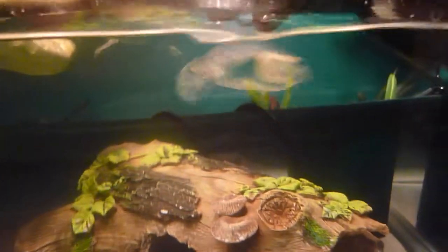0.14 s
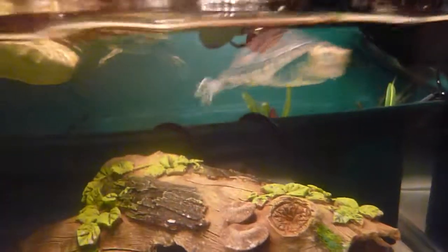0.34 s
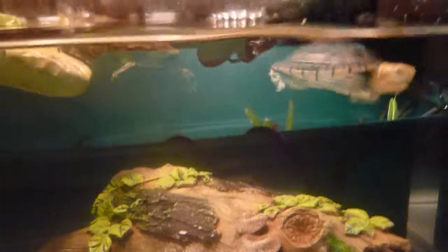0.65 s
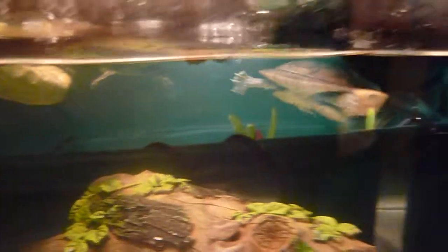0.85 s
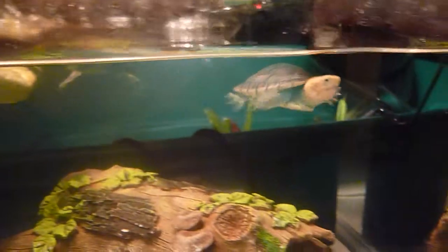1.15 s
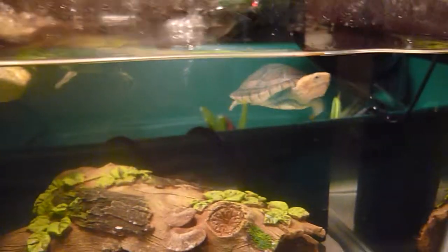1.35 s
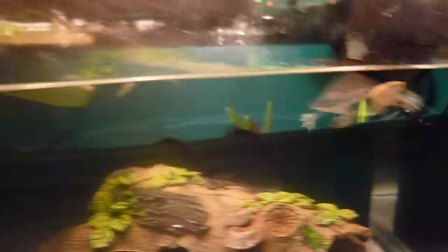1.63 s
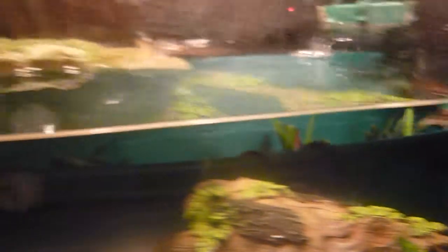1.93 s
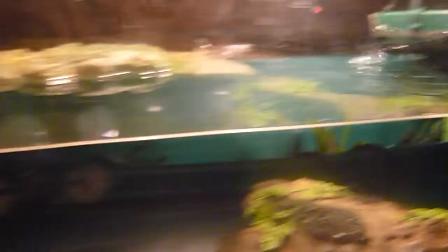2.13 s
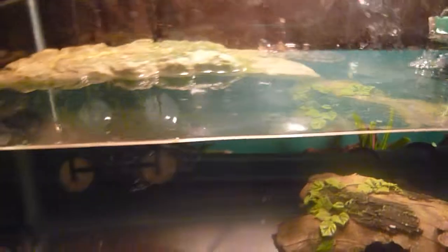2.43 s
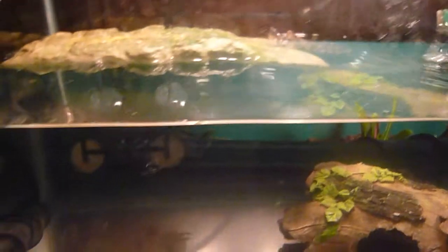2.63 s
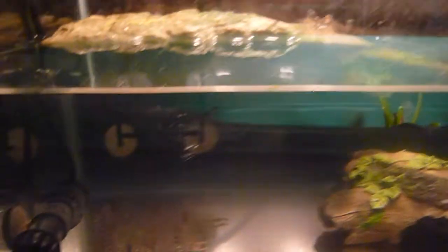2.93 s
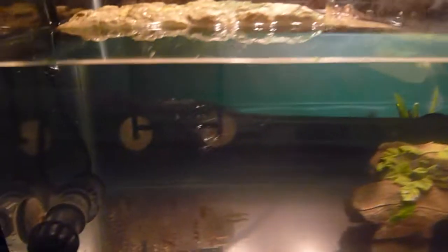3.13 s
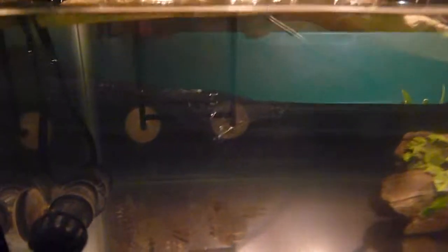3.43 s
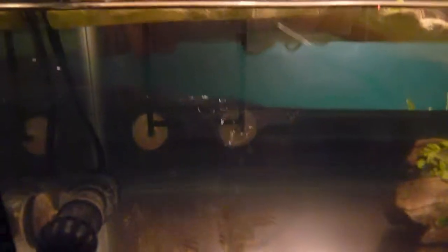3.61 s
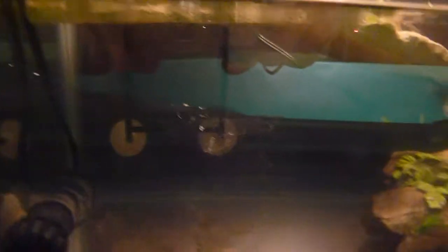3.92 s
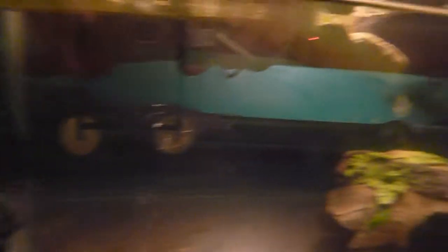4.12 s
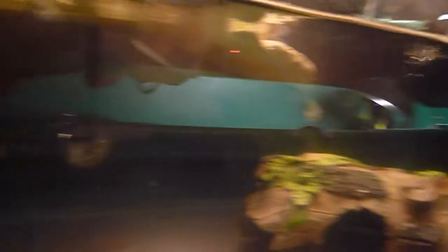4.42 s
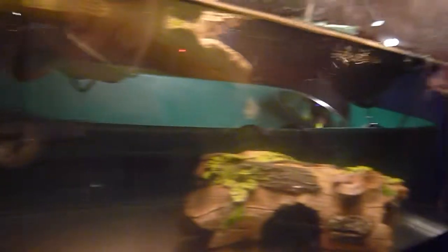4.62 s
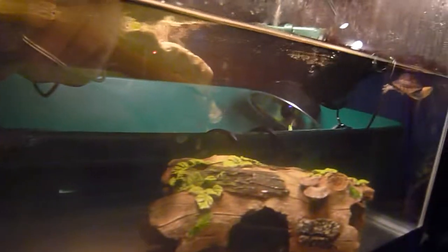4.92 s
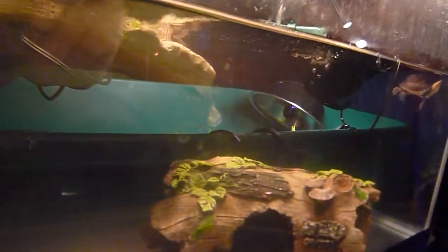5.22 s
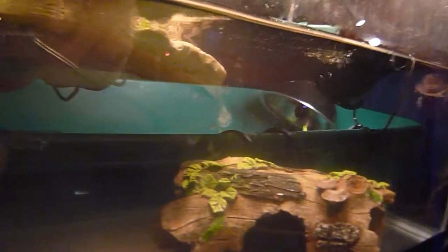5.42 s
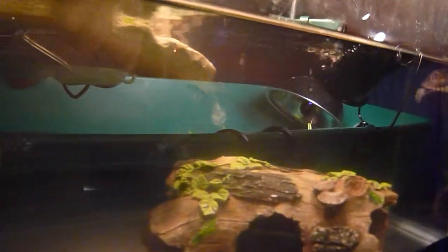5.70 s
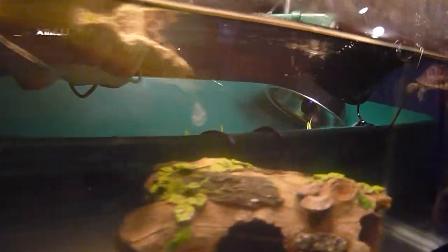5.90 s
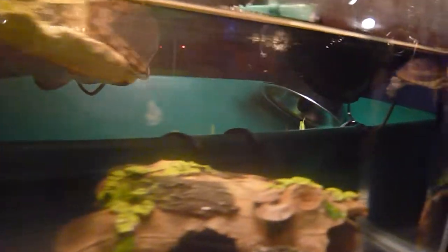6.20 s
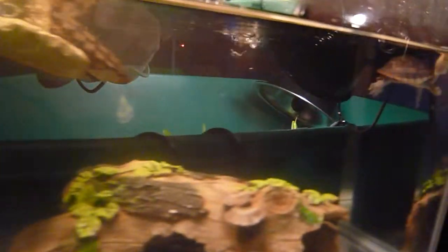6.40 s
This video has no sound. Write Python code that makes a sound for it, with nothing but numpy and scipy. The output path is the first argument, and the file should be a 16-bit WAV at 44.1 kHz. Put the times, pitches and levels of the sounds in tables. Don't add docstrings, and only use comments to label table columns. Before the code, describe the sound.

An aquarium filter hums steadily at a low pitch, its stand and glass rumbling softly underneath. Over it lies a thin water hiss with small bubbles and irregular drips, busiest at the start and again just before three seconds. Tiny bright splashes tap the surface, ringing briefly in glass and hood. A small hand-held microphone adds a few dry handling ticks around the middle.

```python
import sys
import numpy as np
from scipy import signal
from scipy.fft import rfft, irfft, next_fast_len
from scipy.io import wavfile

SR = 44100
rng = np.random.default_rng(int(sys.argv[2]) if len(sys.argv) > 2 else 0)


def wav_out(sig):
    wavfile.write(sys.argv[1], SR, np.round(np.clip(np.atleast_2d(sig).T, -1, 1) * 32767).astype(np.int16))


def to_linear_factor(level_db):
    exponent = np.asarray(level_db, float) / 20
    return 10 ** exponent


N = 288855


def in_time(rows):
    s, *columns = np.transpose(rows)
    return [np.interp(np.arange(N) / SR, s, column) for column in columns]


def drift(rate_hz):
    settle = 2000
    pole = np.exp(-2 * np.pi * rate_hz * 40 / SR)
    noise = rng.standard_normal(N // 40 + 2 + settle)
    slow = signal.lfilter([1], [1, -2 * pole, pole * pole], noise)[settle:]
    return np.interp(np.arange(N) / 40, np.arange(len(slow)), slow / slow.std())


def coloured(points, peaks, patchy_db, rate_hz):
    size = next_fast_len(N, real=True)
    hz = np.maximum(np.fft.rfftfreq(size, 1 / SR), 1)
    point_hz, level_db = np.transpose(points)
    gain = to_linear_factor(np.interp(np.log(hz), np.log(point_hz), level_db, left=-60))
    for centre_hz, width_hz, peak_db in peaks:
        gain = gain * (1 + (to_linear_factor(peak_db) - 1) / (1 + (2 * (hz - centre_hz) / width_hz) ** 2))
    spectrum = rfft(rng.standard_normal(size)) * gain
    shared = drift(rate_hz)
    out = 0
    for octave in range(4, 15):
        band = np.clip(1 - abs(np.log2(hz) - octave), 0, 1)
        flicker = to_linear_factor(patchy_db * (1.34 * shared + drift(rate_hz)))
        out = out + irfft(spectrum * band, size)[:N] * flicker
    return out / out.std()


def pump(hum_db, buzz_db):
    mains_hz = 60.02
    # multiple of mains, level/dB re strongest
    harmonics = [(2, 0), (3, -20), (4, -19), (5, -23), (6, -26), (8, -27), (10, -32)]
    # f/Hz, level/dB re hum
    whirr = [(57.2, -18.5), (220.5, -31), (259, -19.5)]
    buzzing = (3, 4)
    t = np.arange(N) / SR
    lines = [(k * mains_hz, line_db, k in buzzing) for k, line_db in harmonics]
    lines += [(hz, line_db, False) for hz, line_db in whirr]
    out = 0
    for hz, line_db, buzzes in lines:
        waver = to_linear_factor(0.34 * drift(1.0) * (-1.5 - line_db / 8))
        level = to_linear_factor(line_db + buzzes * buzz_db) * waver
        out = out + level * np.sin(2 * np.pi * (hz * t + rng.random()))
    return np.sqrt(2) * to_linear_factor(hum_db) * out


def rumble(level_db):
    # f/Hz, level/dB per Hz
    spectrum = [(25, -17), (34, -12.5), (50, -2.5), (70, -1), (130, 2.5), (170, -1.5), (250, 1.5), (480, 0),
                (560, -6.5), (750, -10.5), (1000, -13), (1500, -17.5), (3000, -37.5)]
    # f/Hz, width/Hz, level/dB
    panels = [(36.2, 9.3, 12.5), (84.8, 14.5, 13), (156, 12, 2.5), (264, 15, 3), (315, 16, 2.5),
              (348, 19, 2), (461, 16.4, 6), (552, 6.2, 7.5), (657, 49, 5), (1100, 12, 6)]
    return to_linear_factor(level_db + 2.0) * coloured(spectrum, panels, patchy_db=0.34, rate_hz=16.0)


def hiss():
    # f/Hz, level/dB per Hz
    spectrum = [(600, -33), (1200, 0.5), (2000, -6.5), (3000, -0.5), (5000, -3.5), (7000, -6.5),
                (10000, -8), (15000, -10)]
    peaks = [(2800, 30, 4), (1280, 60, 3)]  # f/Hz, width/Hz, level/dB
    return to_linear_factor(-57.5) * coloured(spectrum, peaks, patchy_db=0.4, rate_hz=8.0)


def add(track, s, sound):
    at = int(s * SR)
    track[at:at + len(sound)] += sound[:N - at]


def scaled(sound, energy_db):
    return sound * to_linear_factor(energy_db) / np.sqrt(np.sum(sound ** 2) / SR)


def hood():
    # f/Hz, strength, t60/s
    modes = [(1100, 0.41, 0.19), (1290, 0.17, 0.24), (1428, 0.28, 0.21), (2836, 0.29, 0.11),
             (3050, 0.13, 0.11), (3605, 0.22, 0.24)]
    t = np.arange(8000) / SR
    return sum(gain * np.sin(2 * np.pi * hz * t) * to_linear_factor(-60 * t / t60_s) for hz, gain, t60_s in modes)


def echoed(sound, decay_s, chance):
    wall_s, wall_gain, direct_gain = 0.0065, 14.0, 17.0
    room_db, room_t60_s = -6, 0.23
    t = np.arange(len(chance)) / SR
    wall = round(wall_s * SR)
    fading = to_linear_factor(-60 * t / decay_s) + to_linear_factor(room_db - 60 * t / room_t60_s)
    echoes = chance * fading * np.clip(t / wall_s, 0, 1) ** 2
    echoes[0] = direct_gain * np.sqrt(0.2 / max(decay_s, 0.05))
    echoes[wall] += wall_gain * fading[wall]
    fade_out = np.clip((t[-1] - t) / 0.03, 0, 1)
    return signal.fftconvolve(sound, echoes)[:len(t)] * fade_out


def bubble(energy_db, hz, spread_hz, decay_s, chance):
    t = np.arange(3000) / SR
    ring_s = 0.33 / max(spread_hz, 0.07 * hz)
    cycles = (hz - 0.35 * spread_hz) * t + 0.1 * spread_hz * t ** 2 / ring_s
    envelope = np.exp(-t / ring_s) * (1 - np.exp(-t / (0.5 * ring_s)))
    ring = np.sin(2 * np.pi * cycles) * envelope
    return scaled(echoed(ring, decay_s, chance), energy_db)


def trickle():
    count, rate_per_s, floor_db = 400, 40.0, -90
    out = np.zeros(N)
    rows = rng.random((count, 4))
    times = np.cumsum(-np.log(1 - rows[:, 0]) / rate_per_s)
    chances = rng.standard_normal((count, 4000)) + hood()[:4000]
    for s, (_, size, pitch, wide), chance in zip(times, rows, chances):
        if s < N / SR:
            hz = 1000 * 9.0 ** pitch
            spread_hz = hz * (0.052 + 0.069 * wide)
            add(out, s, bubble(floor_db + 9 * size, hz, spread_hz, 0.07, chance))
    return out


def bubbles():
    # t/s, energy/dB, f/Hz, echo t60/s
    drips = [(.073, -60, 1290, 0.1), (.088, -68, 1470, 0.13), (.075, -62.5, 2970, .15),
             (.354, -80, 3420, .08), (.522, -63, 1115, 0.17), (1.117, -62.5, 3700, 0.24),
             (1.18, -75, 2780, .11), (2.331, -67, 1245, 0.32), (2.398, -64.5, 2720, 0.18),
             (2.41, -72, 1300, .12), (2.6, -69.5, 1270, .18), (2.642, -68, 1500, 0.15),
             (2.665, -70, 1100, .1), (2.7, -69, 3350, 0.15), (2.773, -68, 1100, .08),
             (2.795, -70, 1290, .092), (2.927, -70.5, 3440, .11), (2.927, -63, 1100, 0.033),
             (3.432, -66.5, 2760, 0.11), (4.137, -74.5, 3300, .15), (4.524, -66, 2840, 0.052),
             (4.524, -70, 1095, 0.085), (5.252, -73, 2320, 0.098), (4.989, -77, 1100, 0.072),
             (5.625, -78, 2740, .07), (5.885, -72, 2880, 0.093), (6.064, -79, 3520, .07),
             (6.177, -67, 2730, .12)]
    # t/s, energy/dB, f/Hz, echo t60/s
    beads = [(.092, -74, 4470, .27), (.38, -75, 4430, .1), (0.379, -73, 5230, .13), (.516, -78, 5920, .09),
             (.565, -78, 4380, .12), (0.567, -75, 7620, 0.14), (0.63, -73.5, 7750, .17),
             (.797, -74, 5470, 0.3), (.925, -78, 10030, .19), (.926, -71, 7900, .17),
             (1.116, -72, 4200, .12), (1.269, -78, 8390, .14), (1.438, -71.5, 4570, 0.17),
             (1.733, -75, 4520, 0.26), (2.341, -72.5, 4550, 0.064), (2.47, -71, 5260, 0.14),
             (2.666, -73, 4500, .07), (2.882, -73, 6020, 0.073), (2.913, -65.5, 5800, 0.087),
             (3.228, -77, 8770, .19), (3.675, -74.5, 5720, .11), (3.729, -75.5, 3950, .09),
             (3.793, -80, 7760, .29), (4.807, -78, 6840, .27), (4.82, -72, 4480, .25),
             (5.132, -73, 6640, .1), (5.182, -77, 5120, .17), (5.405, -76, 4140, .08),
             (5.972, -80, 8170, .16), (6.163, -75, 6220, .11)]
    out = np.zeros(N)
    drops = [(s, db, hz, 0.052 * hz, decay_s) for s, db, hz, decay_s in drips]
    drops += [(s, db, hz, 0.058 * hz, decay_s) for s, db, hz, decay_s in beads]
    chances = rng.standard_normal((len(drops), 8000)) + hood()
    for (s, *drop), chance in zip(drops, chances):
        add(out, s, bubble(*drop, chance))
    return out


def burst(low_hz, high_hz, length_s, chance):
    t = np.arange(len(chance)) / SR
    band = signal.butter(3, [low_hz, high_hz], "band", fs=SR, output="sos")
    spatter = chance * np.exp(-(t / length_s) ** 2)
    spatter[0] = 11.0
    return signal.sosfilt(band, spatter)


def splashes():
    # t/s, energy/dB, low f/Hz, high f/Hz
    slaps = [(.075, -74, 6000, 12000), (.231, -72.5, 7200, 13500), (.25, -80, 4000, 6500),
             (.445, -69.5, 10600, 16000), (.446, -74, 5000, 9000), (.925, -74, 8500, 16000),
             (1.883, -77, 9000, 15000), (2.64, -72, 2500, 11800), (2.7, -70, 1170, 1750),
             (2.88, -74, 3000, 16000), (3.07, -77, 9000, 15000), (3.303, -75, 3800, 5400),
             (3.385, -82, 7900, 8400), (3.725, -74, 8000, 15500), (4.136, -75, 4000, 16000),
             (4.185, -77, 11000, 16000), (4.36, -79, 11000, 13500), (4.457, -78, 7960, 10000),
             (4.672, -66.5, 12300, 15400), (4.799, -71.5, 4000, 12000), (4.938, -79, 5000, 11000),
             (5.223, -73.5, 6460, 12000), (5.365, -81, 8000, 11000), (5.265, -80, 11500, 13500),
             (5.444, -77, 12000, 16000), (5.543, -74.5, 6000, 14000), (5.922, -75, 12500, 16000),
             (6.162, -75, 7000, 16000), (6.54, -75, 2500, 12000)]
    # t/s, energy/dB, low f/Hz, high f/Hz
    sprays = [(.34, -73.5, 2500, 6500), (.622, -77, 8000, 14000), (.787, -76, 2500, 5000),
              (.788, -75, 6000, 16000), (.82, -73, 6000, 16000), (.814, -73.5, 2900, 3800),
              (1.845, -75.5, 3720, 4700), (1.44, -75, 3980, 6200), (1.724, -77, 2500, 15000),
              (2.641, -66, 890, 1720), (3.222, -71.5, 8500, 14500), (3.823, -66.5, 4500, 16000),
              (5.85, -72.5, 4200, 7500), (5.955, -78, 7000, 10000)]
    slap_s, spray_s, decay_s = 0.002, 0.025, 0.2
    out = np.zeros(N)
    hits = [(*row, slap_s) for row in slaps] + [(*row, spray_s) for row in sprays]
    chances = rng.standard_normal((len(hits), 2, 8000))
    for (s, energy_db, *shape), (spatter, echo) in zip(hits, chances):
        add(out, s, scaled(echoed(burst(*shape, spatter), decay_s, echo), energy_db))
    return out


def ticks():
    # t/s, energy/dB, low f/Hz, high f/Hz
    clicks = [
        (1.687, -85, 600, 6000),
        (1.737, -84, 6000, 15000),
        (1.768, -77, 4500, 16000),
        (1.858, -85, 11000, 16000),
        (2.641, -77, 2500, 16000),
        (4.331, -82, 8000, 15000),
        (4.349, -72.5, 3500, 16000),
        (4.379, -79, 5000, 9000),
        (4.424, -70, 3000, 14000),
    ]
    out = np.zeros(N)
    for (s, energy_db, *band), chance in zip(clicks, rng.standard_normal((len(clicks), 1000))):
        add(out, s, scaled(burst(*band, 0.0022, chance), energy_db))
    return out


def lens_motor():
    runs = [
        (3.63, 3.92, -74),
        (4.02, 4.14, -79),
        (4.26, 4.4, -78),
    ]
    whine_hz, edge_s = 14336, 0.02
    t = np.arange(N) / SR
    running = 0
    for start_s, end_s, level_db in runs:
        running = running + to_linear_factor(level_db) * np.clip(np.minimum(t - start_s, end_s - t) / edge_s, 0, 1)
    return np.sqrt(2) * running * np.sin(2 * np.pi * whine_hz * t)


def scene():
    # t/s, hum level/dB, rumble level/dB, casing buzz level/dB
    pan = [(0, -34, -44, -10), (1, -35, -44, -7), (2, -35.5, -44.5, -2), (3, -36.5, -44.5, 3),
           (4, -37, -44.5, 3.5), (4.5, -36, -45, 3), (5.3, -35.5, -45, 2), (6.55, -36, -44.5, -1)]
    hum_db, rumble_db, buzz_db = in_time(pan)
    machine = pump(hum_db, buzz_db) + rumble(rumble_db)
    water = hiss() + trickle() + bubbles() + splashes()
    camera = ticks() + lens_motor()
    return (machine + water + camera)[None]


def band_limit(x):
    return signal.sosfilt(signal.butter(12, 15800, fs=SR, output="sos"), x)


def record(dry):
    gap_hz, width_hz, leak = 2107, 624, 0.016
    b, a = signal.iirnotch(gap_hz, gap_hz / width_hz, SR)
    notched = signal.lfilter(b, a, dry)
    leaky = notched + leak * (dry - notched)
    top = signal.ellip(10, 0.3, 60, 15850, fs=SR, output="sos")
    return band_limit(signal.sosfilt(top, leaky))


dry = scene()
out = record(dry)
wav_out(out)
```